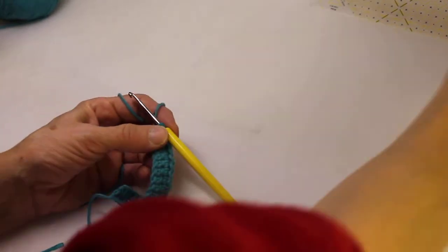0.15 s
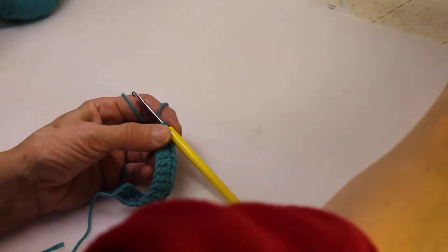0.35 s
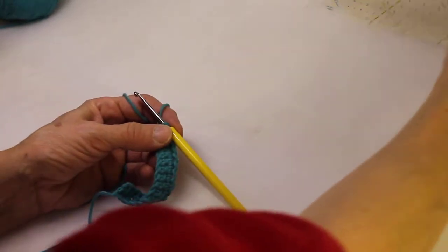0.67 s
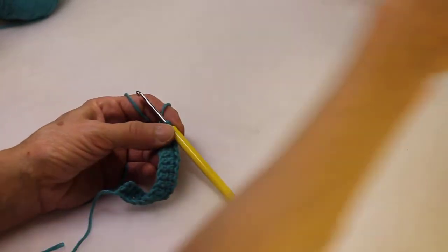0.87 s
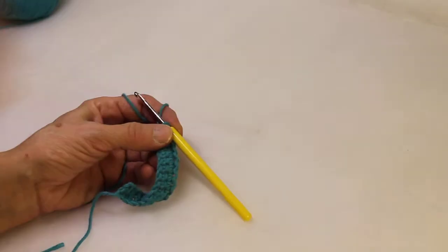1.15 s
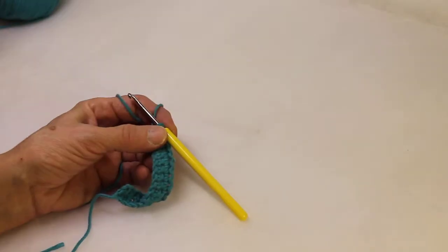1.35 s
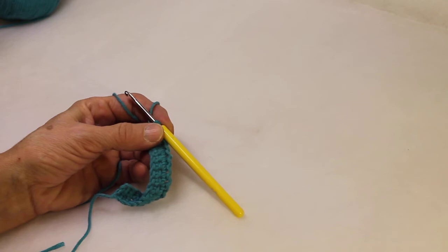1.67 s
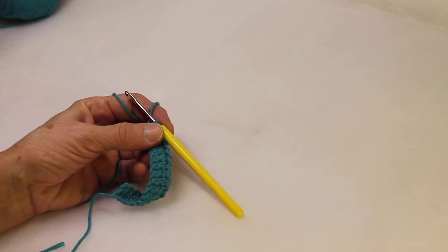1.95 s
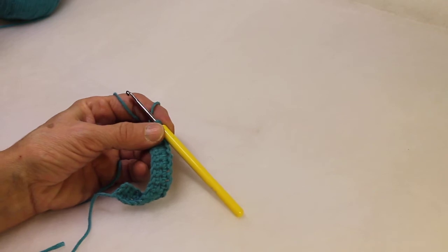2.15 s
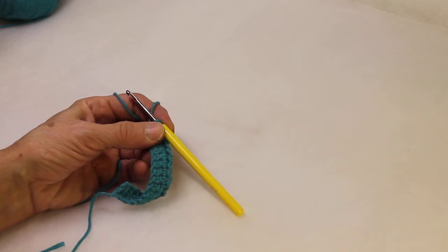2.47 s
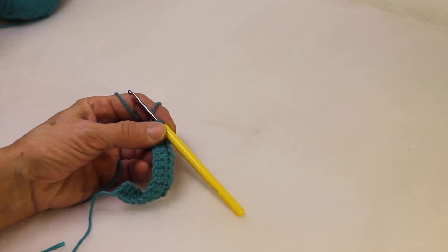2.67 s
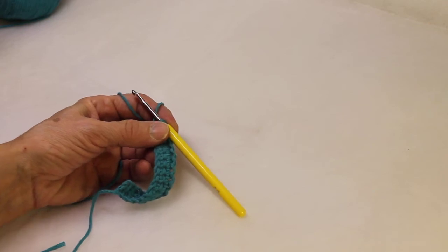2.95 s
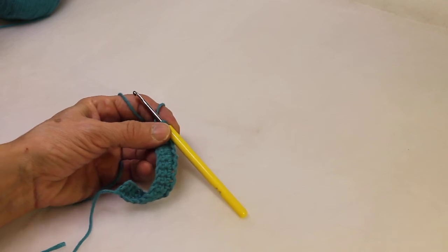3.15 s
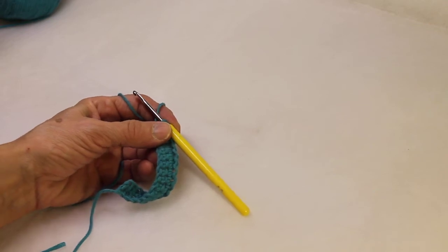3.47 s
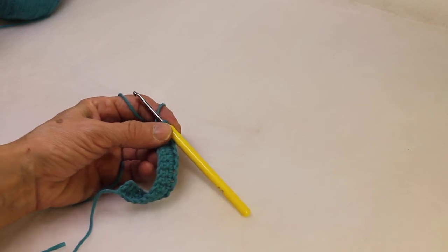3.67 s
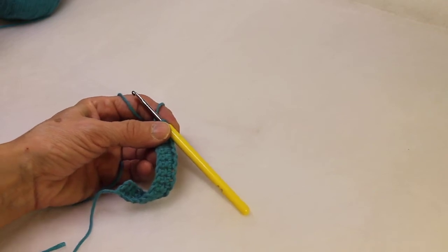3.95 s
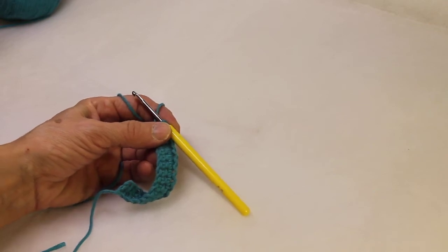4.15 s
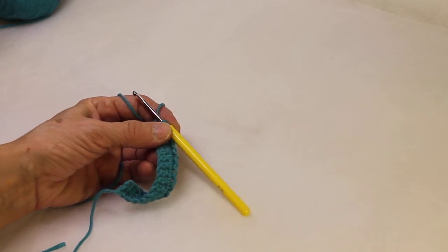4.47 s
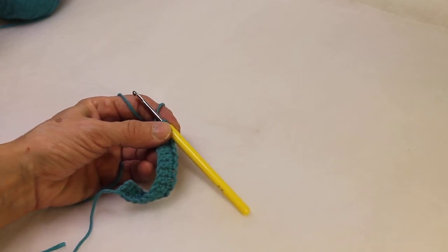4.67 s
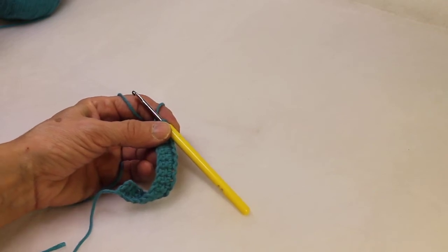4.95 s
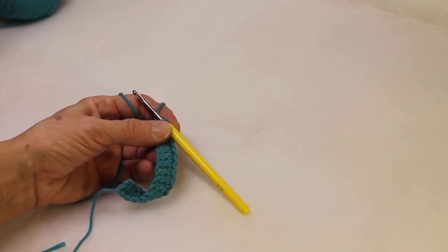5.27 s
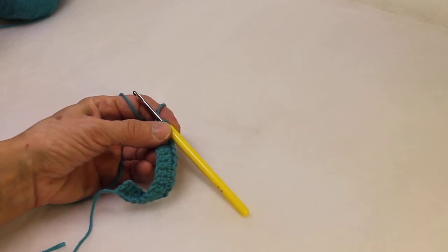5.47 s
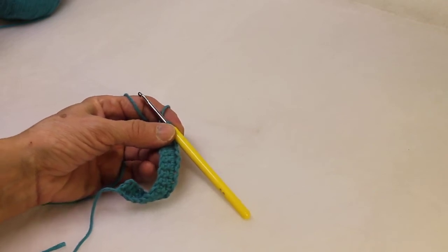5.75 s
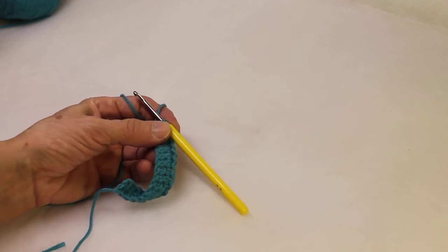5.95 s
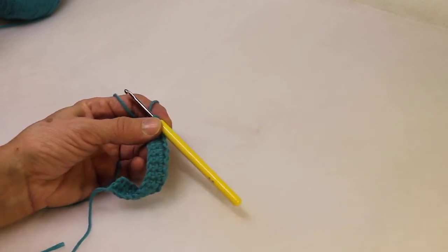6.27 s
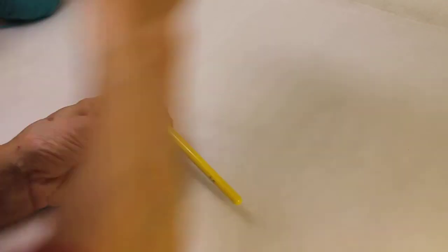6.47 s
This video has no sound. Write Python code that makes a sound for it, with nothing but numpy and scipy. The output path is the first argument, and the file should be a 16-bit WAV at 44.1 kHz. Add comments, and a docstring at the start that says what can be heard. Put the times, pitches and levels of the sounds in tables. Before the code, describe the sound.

Close handling ticks and rubs, a fingernail tap, two sharp plastic snaps, then small tools scraping and knocking on a table in a quiet room.

```python
"""Close to a crochet table in a small, quiet room, with soft air and microphone hiss throughout.
At first a hand handles a camera: ticks, rubs, bumps and a dry fingernail tap, as short clicks and noise.
Then things knock on the table, and a plastic catch snaps twice, with spring clicks and a ringing case.
Small tools slide and scrape about in noise bursts, and late knocks follow.
A sleeve, made of swelling noise, swishes from the start whenever the arm moves."""
import sys
import numpy as np
from scipy import signal
from scipy.fft import rfft
from scipy.io import wavfile
from scipy.ndimage import uniform_filter1d

SR = 44100
rng = np.random.default_rng(int(sys.argv[2]) if len(sys.argv) > 2 else 0)


def generate_wav(sig):
    """Save sig (samples, or channels by samples) to the path in sys.argv[1] as 16-bit PCM at SR."""
    pcm = np.round(np.clip(np.atleast_2d(sig).T, -1, 1) * 32767).astype(np.int16)
    wavfile.write(sys.argv[1], SR, pcm)


N = 291501
HZ = np.fft.rfftfreq(4096, 1 / SR)

# basic colour of tools rubbing on the table and on one another: f/Hz, level/dB
SCRAPE_COLOUR = [(180, -14), (300, -16), (392, -26), (565, 0.5), (870, -7.5), (1410, 1), (1810, 1.5),
                 (2170, -4.5), (2320, 0.5), (3190, -3.5), (3700, -0.5), (8500, -12.5), (10400, -18),
                 (13100, -16), (16000, -23)]


def amp(db):
    """Turns decibels into a plain gain."""
    return 10 ** (np.asarray(db) / 20)


def evened(x):
    """Scales a signal to an average strength (rms) of 1."""
    return x / np.sqrt(np.mean(x ** 2) + 1e-20)


def read(points, hz=HZ):
    """Reads a table of frequency and value, with pitch spaced by ratio as the ear hears it."""
    f, value = np.transpose(points)
    return np.interp(np.log(hz + 1), np.log(f + 1), value)


def add(mix, s, sound):
    """Mixes a sound in, starting at time s."""
    part = mix[max(round(s * SR), 0):][:len(sound)]
    part += sound[:len(part)]


def impulse(db):
    """Makes the click of energy 1 with this spectrum shape, its energy packed close to its start."""
    log_gain = np.log(amp(np.maximum(db - db.max(), -100)))
    circle = np.concatenate([log_gain, log_gain[-2:0:-1]])
    # the phase follows from the loudness curve, so nothing sounds before the click
    click = np.fft.ifft(np.exp(np.conj(signal.hilbert(circle)))).real
    return click / np.linalg.norm(click)


def hiss(colour):
    """Steady coloured noise of rms 1."""
    noise = rng.standard_normal(N + SR)
    coloured = signal.oaconvolve(noise, impulse(read(colour)), "valid")
    return evened(coloured[:N])


def clicks(rows, colour):
    """Single clean clicks of one colour, from rows of time and level."""
    out, click = np.zeros(N), impulse(read(colour))
    for s, db in rows:
        add(out, s, amp(db) * click)
    return out


def room(x, wet_db, build):
    """Adds wall reflections that build up, then fade at a pace set by pitch; each call draws a new pattern."""
    # time to fade by 60 dB: f/Hz, time/s
    fade_times = [(100, 0.55), (500, 0.23), (1200, 0.28), (2500, 0.27), (5000, 0.23), (9000, 0.23),
                  (14000, 0.15)]
    hz, t = np.fft.rfftfreq(256, 1 / SR), np.arange(120) * 128 / SR
    scatter = np.exp(2j * np.pi * rng.random((len(hz), len(t))))
    fading = amp(-60 * t / read(fade_times, hz)[:, None])
    tail = signal.istft(scatter * fading, SR, nperseg=256)[1]
    tail *= 1 - np.exp(-(np.arange(len(tail)) / SR / build) ** 2)
    reflections = signal.fftconvolve(x, tail / np.linalg.norm(tail))[:len(x)]
    return x + amp(wet_db) * reflections


def swelling(s, db, length, swell):
    """Start, level, rise and fade of a stroke that swells for a share of its length."""
    share = np.clip(swell, .05, .95)
    return s, db, share * length, (1 - share) * length


def contacts(rows, colour, grain_db, resonance_db, sharpness, wet_db):
    """Each contact is a swarm of tiny slips of uneven size that swells and dies away."""
    out, t = np.zeros(N), np.arange(SR // 3) / SR
    for s, db, rise, fade, tilt, hz in rows:
        force = np.minimum(t / rise, 1) * np.exp(-np.maximum(t - rise, 0) / fade)
        unevenness = evened(uniform_filter1d(rng.standard_normal(len(t)), size=24))
        sizes = amp(grain_db * np.clip(unevenness, -2, 2))
        slips = force * sizes * rng.standard_normal(len(t))
        # the slips are evened out over frequency, so the material sets the broad colour
        slip_power = uniform_filter1d(abs(rfft(slips[:4096])) ** 2, size=61)
        slips_db = 10 * np.log10(slip_power + 1e-12)
        hardness_db = tilt * np.log2(HZ + 100)
        body_db = resonance_db / (1 + (sharpness * (HZ - hz) / hz) ** 2)
        material = impulse(read(colour) + hardness_db + body_db - slips_db)
        sound = signal.fftconvolve(slips, material)
        levelled = amp(db) * sound * np.linalg.norm(force) / np.linalg.norm(sound)
        add(out, s, room(levelled, wet_db, build=0.0074))
    return out


def ring(s, modes, rise):
    """Adds up dying tones (f/Hz, level/dB, time to fade by 60 dB/s), eased in from time s."""
    out, t = np.zeros(N), np.arange(SR // 2) / SR
    tone = 0
    for hz, db, t60 in modes:
        tone = tone + amp(db - 60 * t / t60) * np.sin(2 * np.pi * (hz * t + rng.random()))
    add(out, s, tone * (1 - np.exp(-t / rise)))
    return out


def quiet_room():
    """Room air and microphone hiss: steady noise under everything."""
    # f/Hz, level/dB
    air_colour = [(15, -53), (25, -47), (80, -11.5), (344, -2.5), (373, -6), (659, -5), (863, -6),
                  (1130, -6.5), (1260, -7.5), (2000, -10), (2990, -11.5), (3430, -13), (4370, -14),
                  (4740, -13.5), (16000, -26.5)]
    return amp(-60.5) * hiss(air_colour)


def sleeve():
    """Soft cloth friction that swells and ebbs with each move of the arm and flutters as folds pass."""
    # one swish for each move of the arm: t/s at full speed, level/dB before flutter, half length/s
    swishes = [(0.103, -54.5, 0.16), (.42, -57.5, 0.13), (.86, -61, 0.25), (1.343, -56.5, 0.27),
               (1.827, -64, 0.17), (2.7, -63.5, 0.29), (3.09, -54.5, 0.14), (4.6, -66, 0.61),
               (6.38, -60, 0.44)]
    # cloth: f/Hz, level/dB
    cloth_colour = [(47, -50.5), (80, -37), (150, -9.5), (233, -4), (624, -3), (949, -6.5), (1380, -5.5),
                    (2290, -9.5), (5080, -13.5), (12000, -27), (15600, -71), (22000, -120)]
    t = np.arange(N) / SR
    power = sum((amp(db) * np.exp(-((t - s) / half) ** 2)) ** 2 for s, db, half in swishes)
    flutter = np.tanh(evened(uniform_filter1d(rng.standard_normal(N), size=400)))
    return np.sqrt(power) * amp(2.5 * flutter) * hiss(cloth_colour)


def camera_rubs():
    """Fingers rub the camera: friction heard nearly dry through its shell."""
    # t/s, level/dB before reflections, length/s, tilt/dB per octave
    rubs = [(0.038, -50, 0.05, -2), (0.405, -46, 0.011, -1), (.508, -51, 0.053, -0.5),
            (.693, -48, 0.0058, -3.5), (0.698, -42, 0.0041, 3), (0.74, -51, .011, -0.5),
            (.832, -53, .022, 2), (1.114, -44, 0.013, 1), (1.133, -43.5, 0.044, 1.6), (1.191, -41, .007, 1),
            (1.357, -48.5, 0.014, 2), (1.909, -47, 0.0036, 2)]
    # skin on shell: f/Hz, level/dB
    rub_colour = [(180, -46), (300, -23), (398, -0.5), (678, -2), (1190, -7.5), (1640, -1), (2280, -3.5),
                  (2610, -5.5), (3290, -7), (5430, -7), (7080, -7.5), (12300, -12.5), (16000, -18)]
    swell, shell_hz = .52, 2760  # share of a rub spent pressing harder; shell resonance that it excites
    strokes = [(*swelling(s, db, length, swell), tilt, shell_hz) for s, db, length, tilt in rubs]
    return contacts(strokes, rub_colour, grain_db=2.5, resonance_db=6.5, sharpness=13, wet_db=-15)


def camera_ticks():
    """The camera shell ticks under the grip, with fainter random ticks until the hand lets go."""
    # t/s, level/dB before the shared boost
    ticks = [(.0384, -34), (.0427, -31.5), (.0652, -37.5), (.0714, -38.5), (.197, -42), (.2475, -38.5),
             (.2859, -45.5), (.3344, -44), (.3721, -34), (.4052, -40), (.428, -44), (.6419, -47.5),
             (.9784, -45), (1.0463, -38.5), (1.2094, -48)]
    # shell ticks: f/Hz, level/dB
    tick_colour = [(200, -18), (1000, -12.5), (1700, -4.5), (2300, -8), (3000, 2.5), (3700, -11.5),
                   (4500, -9), (6000, -18.5), (9000, -16.5), (16000, -52)]
    grip_ends_s, faint_per_s, faint_db = 1.22, 6, -49  # faint level is also before the boost
    boost_db = 15.5
    moments = rng.random(round(faint_per_s * grip_ends_s))
    faint = [(grip_ends_s * when, faint_db) for when in moments]
    return amp(boost_db) * clicks(ticks + faint, tick_colour)


def camera_bumps():
    """The hand bumps the camera softly: short thuds that come nearly dry through the shell."""
    # t/s, level/dB before reflections, fade/s, pitch of the thud f/Hz
    bumps = [(.07, -39.5, 0.0063, 202), (.118, -55, .03, 200), (.208, -36.5, .033, 316),
             (0.236, -45.5, 0.036, 103), (.798, -43, 0.0075, 610), (.82, -57, 0.023, 800),
             (0.904, -55.5, 0.061, 396), (1.235, -57, .05, 825), (1.495, -56, 0.027, 300)]
    # soft hand on shell: f/Hz, level/dB
    bump_colour = [(25, -38), (50, -20), (90, -7), (200, -0.5), (320, -3), (480, -8), (750, -5.5),
                   (1100, -13), (2000, -22.5), (4000, -28.5), (9000, -53)]
    rise_share = 0.16  # rise time over fade time
    thuds = []
    for s, db, fade, hz in bumps:
        # a higher thud is a harder touch, so it is brighter too; no tilt at 270 Hz
        tilt = 3.6 * np.log2(hz / 270)
        thuds.append((s, db, rise_share * fade, fade, tilt, hz))
    return contacts(thuds, bump_colour, grain_db=2.5, resonance_db=12.0, sharpness=7.1, wet_db=-14)


def camera_tap():
    """A fingernail lands on the camera and bounces once: two cracks, and the shell rings at the first."""
    # landing and bounce: t/s, level/dB
    taps = [(.139, 5.5), (.1437, -13)]
    # the shell's crack: f/Hz, level/dB
    crack_colour = [(100, -28), (400, -19), (950, -37), (1350, 6), (1800, 1.5), (2500, -12.5), (3800, -7),
                    (5200, -10.5), (6300, -20.5), (7500, -18), (9000, -45), (12500, -42), (16000, -65)]
    # the shell's own tones: f/Hz, level/dB before easing in, time to fade by 60 dB/s
    shell_modes = [(300, -58, .2), (1340, -22, 0.037), (1685, -33, 0.06), (1950, -26, 0.035),
                   (2220, -21, 0.025), (2820, -43, 0.089), (3400, -34, 0.031), (3710, -37, 0.096),
                   (6743, -43, 0.03)]
    return clicks(taps, crack_colour) + ring(taps[0][0], shell_modes, rise=0.00077)


def table_knocks():
    """Things knock on the table top: equally short blows, each with its own resonance."""
    # t/s, level/dB before reflections, tilt/dB per octave, resonance f/Hz
    knocks = [(1.954, -49.5, -4.5, 1290), (2.429, -51.5, 4, 1960), (3.514, -35, 2, 600),
              (4.1142, -32, -1, 1860), (4.158, -45, 3.5, 900), (4.388, -45, -1.5, 630),
              (5.3, -47.5, 1.5, 1140), (6.459, -42, 2.4, 1280), (6.463, -45, -3.5, 337)]
    # table top: f/Hz, level/dB
    knock_colour = [(40, -22), (90, -15), (200, -8), (350, -2), (520, 1.5), (680, 6.5), (850, -5),
                    (1200, -1), (1700, 3), (2050, -4), (2600, -5), (5500, -11.5), (9000, -20), (16000, -32)]
    rise_s, fade_s = 0.001, 0.0058
    blows = [(s, db, rise_s, fade_s, tilt, hz) for s, db, tilt, hz in knocks]
    return contacts(blows, knock_colour, grain_db=2.5, resonance_db=9.5, sharpness=11, wet_db=-1.4)


def catch_snaps():
    """The plastic catch snaps shut and open: hard, brief cracks with strong reflections."""
    # t/s, level/dB before reflections, fade/s, tilt/dB per octave
    snaps = [(2.674, -41.5, 0.011, -1.5), (2.6804, -22.5, 0.0033, .9), (2.694, -31, 0.016, .5),
             (2.8161, -10, 0.00072, -0.34), (2.8184, -14, 0.0019, 1.5)]
    # hard plastic: f/Hz, level/dB
    snap_colour = [(40, -45), (125, -16.5), (290, -21.5), (470, -6.5), (720, -6), (950, -4.5), (1700, -5.5),
                   (2900, -9), (4700, -9.5), (8000, -13), (10500, -17.5), (13200, -15.5), (16000, -25)]
    rise_share, plastic_hz = 0.12, 1550  # rise time over fade time; centre of the plastic's colouring
    cracks = [(s, db, rise_share * fade, fade, tilt, plastic_hz) for s, db, fade, tilt in snaps]
    # the negative resonance makes a dip in the colour
    return contacts(cracks, snap_colour, grain_db=1.5, resonance_db=-2, sharpness=11, wet_db=-0.7)


def case_rings():
    """Each snap sets the case ringing in a different group of dying tones."""
    # t/s, then a list of tones: f/Hz, level/dB before easing in, time to fade by 60 dB/s
    ringings = [(2.681, [(358, -43, 0.16), (491, -43.5, 0.3), (847, -52, .35), (865, -31, 0.2),
                (1005, -55, 0.29), (1170, -34.5, 0.22), (1333, -36.5, 0.38), (1372, -39, 0.36),
                (1960, -33.5, 0.16), (2380, -38.5, 0.26)]), (2.816, [(128, -68, .4), (225, -55, 0.66),
                (678, -38.5, 0.37), (761, -39, 0.29), (897, -31.5, 0.27), (969, -32, 0.22),
                (1018, -38, 0.37), (1094, -38, 0.32), (1535, -32, 0.2), (2229, -56, 0.27),
                (2637, -34.5, 0.21)])]
    return sum(ring(s, modes, rise=0.004) for s, modes in ringings)


def spring_pings():
    """The catch's small spring pings: bright clicks with faint reflections."""
    # t/s, level/dB before reflections
    pings = [(2.6831, -1.5), (2.6864, -15), (2.7072, -11), (2.8204, -8)]
    # spring: f/Hz, level/dB
    ping_colour = [(1000, -34), (7000, -13), (9500, -5), (12500, 3), (14500, -9), (16000, -16)]
    return room(clicks(pings, ping_colour), wet_db=-30, build=.008)


def tool_slides():
    """Between catches the tools slide smoothly: longer strokes of friction on the table."""
    # t/s, level/dB before reflections, length/s
    slides = [(3.112, -56, 0.068), (3.538, -53, 0.15), (3.975, -50, 0.051), (4.235, -52.5, 0.069),
              (4.471, -49.5, 0.069), (4.84, -54, 0.084), (5.193, -58.5, 0.038), (5.436, -56, 0.045)]
    swell = 0.28  # share of a slide spent speeding up
    tilt_db, slide_hz = 1.3, 3680  # tilt per octave; centre of a slight dip in the colour
    drags = [(*swelling(s, db, length, swell), tilt_db, slide_hz) for s, db, length in slides]
    return contacts(drags, SCRAPE_COLOUR, grain_db=4, resonance_db=-0.5, sharpness=20, wet_db=-2)


def tool_scrapes():
    """Tools catch on one another and slip free: short scratchy bursts, each with its own resonance."""
    # t/s, level/dB before reflections, fade/s, tilt/dB per octave, resonance f/Hz
    scrapes = [(3.626, -41, 0.0095, 0.3, 1490), (3.642, -44.5, 0.02, 3, 4000), (3.706, -47, 0.013, 2, 5470),
               (3.731, -43, 0.013, 2.5, 2400), (3.95, -51.5, 0.0084, 0, 4500),
               (4.229, -46.5, 0.0085, 2.5, 3870), (4.299, -51, 0.0088, 4, 5500), (4.35, -42, .012, 3, 2300),
               (4.39, -45, .008, 2.5, 4000), (4.407, -41, .013, 2, 3760), (4.455, -39, 0.0097, 6, 4600),
               (4.528, -38.5, 0.0085, 3, 3970), (4.677, -49, 0.0089, 5, 5200),
               (4.686, -40.5, .009, 4.5, 3030), (4.811, -44, 0.0059, 1.5, 1900),
               (4.8829, -38, 0.0087, 4, 3060), (5.243, -42, .007, 5.5, 5000), (5.299, -40, .0045, 2, 4100),
               (5.502, -45.5, 0.0091, 1, 3800)]
    rise_share = 0.18  # rise time over fade time
    slips = [(s, db, rise_share * fade, fade, tilt, hz) for s, db, fade, tilt, hz in scrapes]
    return contacts(slips, SCRAPE_COLOUR, grain_db=3.0, resonance_db=6, sharpness=26, wet_db=-2)


def scene():
    """All the handling over the quiet of the room, as one channel."""
    camera = camera_rubs() + camera_ticks() + camera_bumps() + camera_tap()
    catch = catch_snaps() + case_rings() + spring_pings()
    table = table_knocks() + tool_slides() + tool_scrapes()
    return (quiet_room() + sleeve() + camera + table + catch)[None]


def record(dry):
    """The recorder's band limit: a filter removes what lies above its edge."""
    edge_hz = 15900
    low_pass = signal.firwin(511, edge_hz, window=("kaiser", 9), fs=SR)
    return signal.oaconvolve(dry, low_pass[None], "same")


dry = scene()
out = record(dry)
generate_wav(out)
```